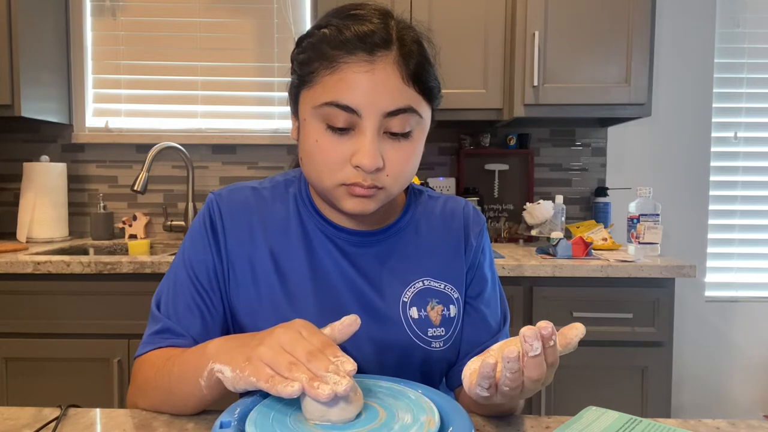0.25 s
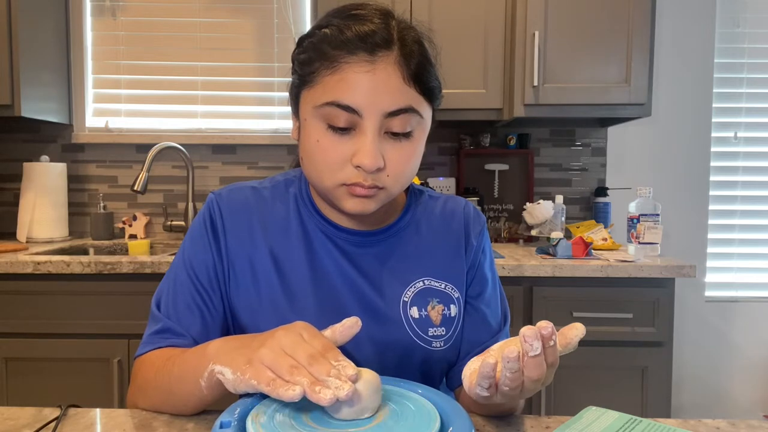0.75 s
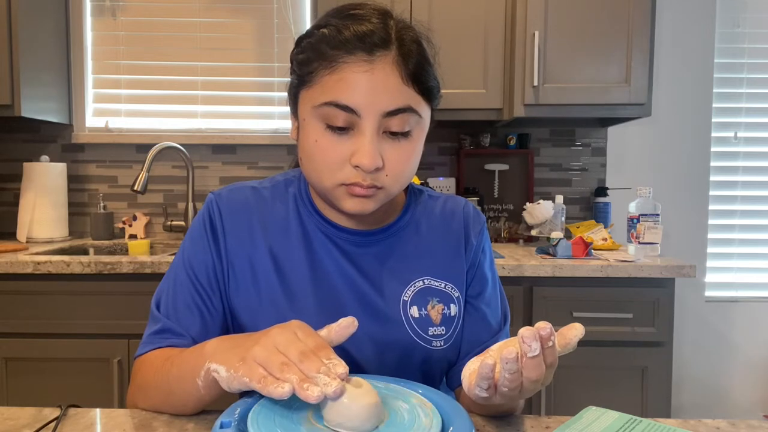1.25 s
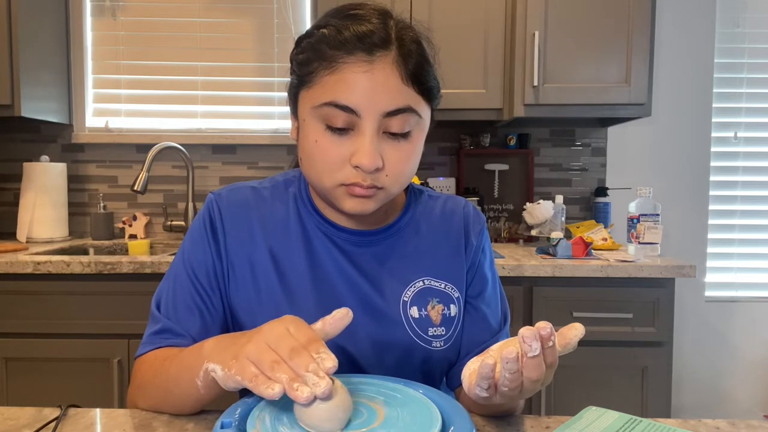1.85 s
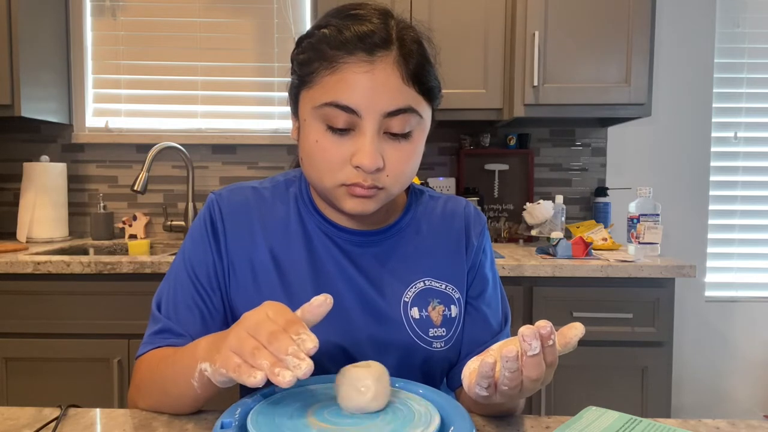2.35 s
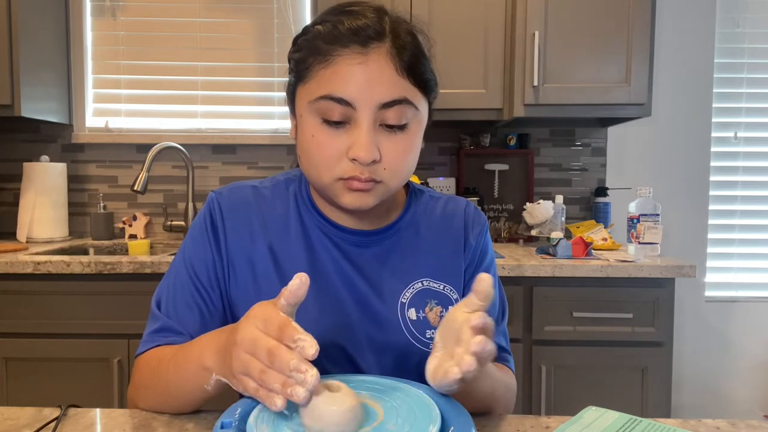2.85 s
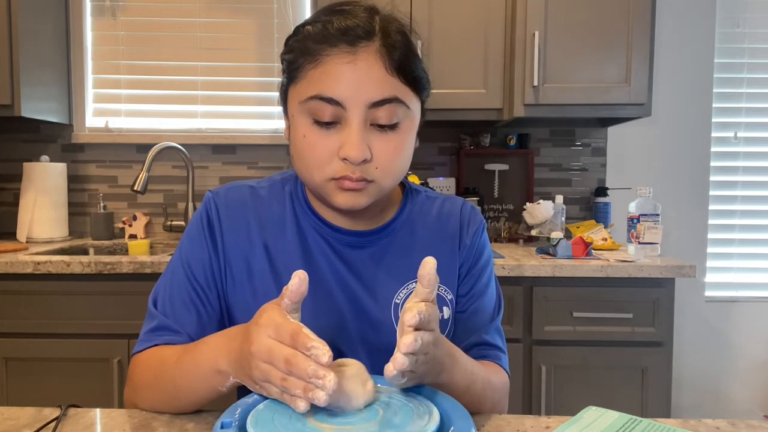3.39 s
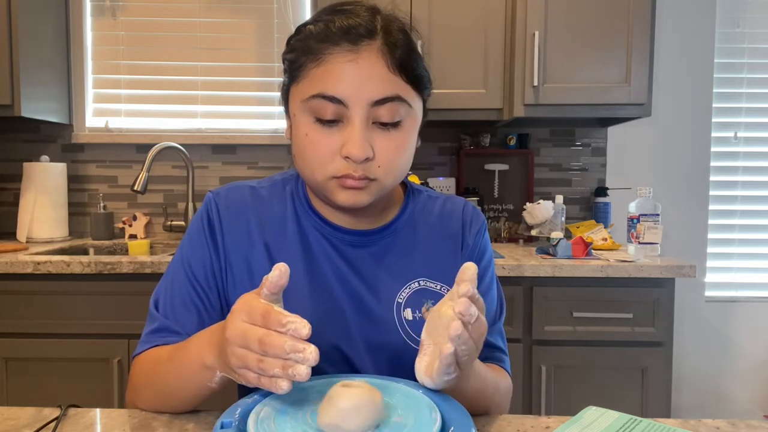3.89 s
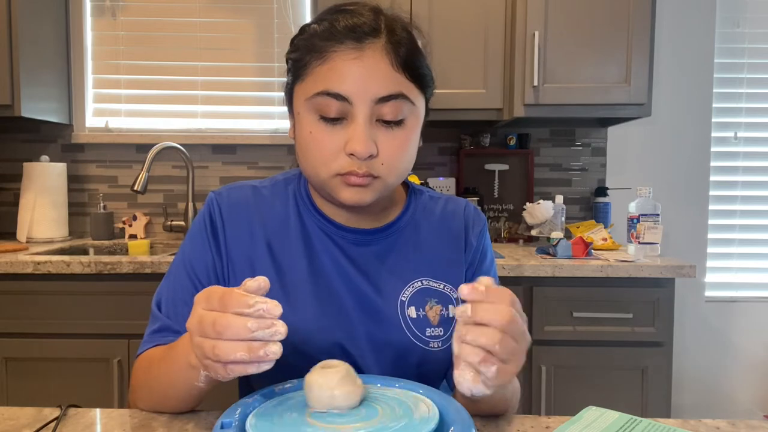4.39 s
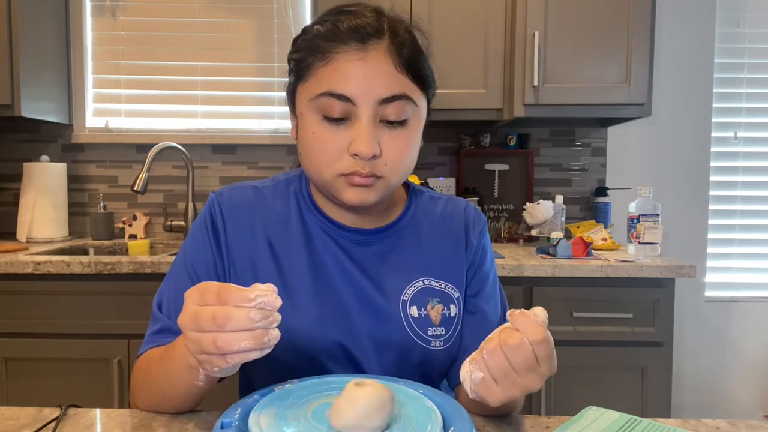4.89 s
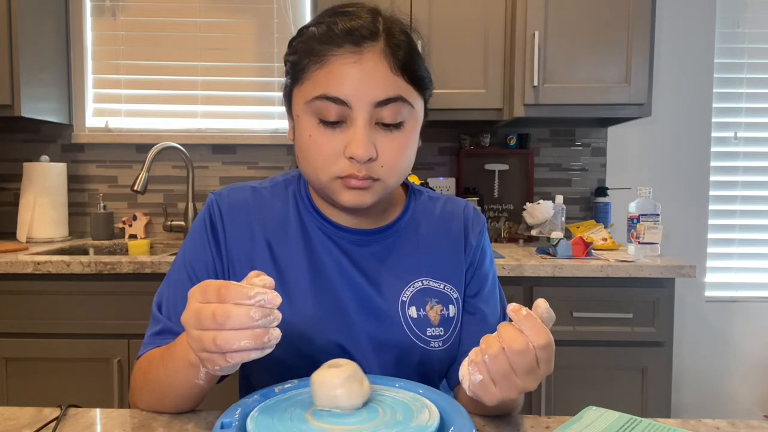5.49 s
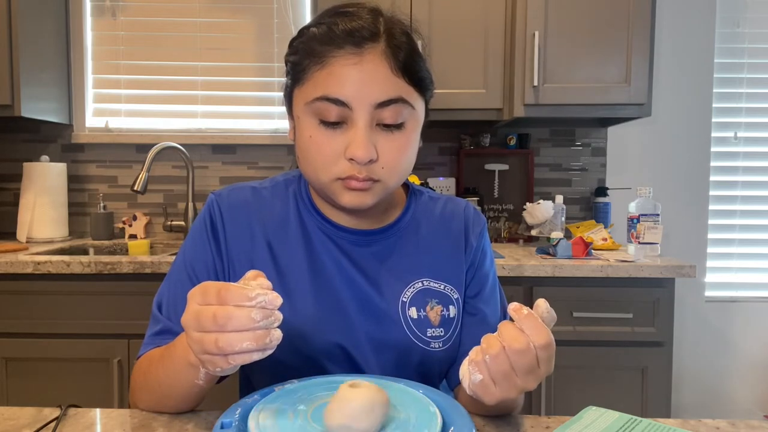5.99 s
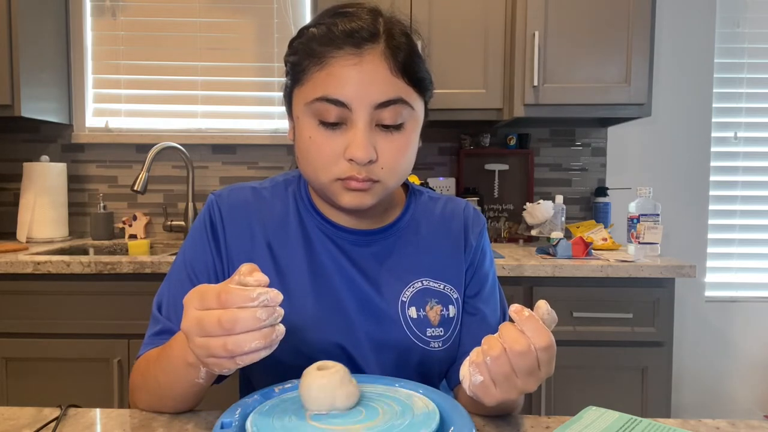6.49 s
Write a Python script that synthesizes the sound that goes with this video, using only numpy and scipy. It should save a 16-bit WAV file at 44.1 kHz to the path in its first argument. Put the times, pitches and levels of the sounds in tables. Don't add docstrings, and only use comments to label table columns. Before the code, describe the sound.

A battery toy pottery wheel is already running at the start and never stops, close to a stereo phone in a reflective kitchen. Plastic gears give a nasal, buzzing whine near 500 Hz with two strong overtones, wrapped in a dry, hollow rattle and bright ticking that flutters about twenty times a second. The pitch starts slightly low, climbs by 0.6 s, then sags from 1.1 s as a hand loads the clay, lowest near 1.5 s, where the whine is firmer and clearer. It wobbles, then jumps up around 2 s, looser and more rattly. Another brief dip comes at 2.9-3.1 s, recovering by 3.35 s. From there to 6.7 s the speed is nearly steady, the tone trembling with momentary dropouts. Small sharp plastic clicks occur irregularly throughout, roughly a tenth of a second apart early on. Faint fridge hum and low air rumble lie beneath, with a short room tail.

```python
import sys
import numpy as np
from scipy import signal
from scipy.fft import rfft, irfft, next_fast_len
from scipy.io import wavfile
from scipy.ndimage import uniform_filter1d

SR = 44100
rng = np.random.default_rng(int(sys.argv[2]) if len(sys.argv) > 2 else 0)


def wrap_up_sound(samples):
    columns = np.atleast_2d(samples).T
    tamed = np.clip(columns, -1, 1)
    steps = np.round(tamed * 32767).astype(np.int16)
    wavfile.write(sys.argv[1], SR, steps)


def gain_from_db(level_db):
    decades = np.asarray(level_db, float) / 20
    return 10 ** decades


N = 297234
SIZE = next_fast_len(N + SR)
HZ = np.arange(SIZE // 2 + 1) * SR / SIZE
TIME_S = np.arange(N) / SR


def level(x, db=0):
    return x * gain_from_db(db) / np.sqrt(np.mean(x ** 2))


def curve(table):
    time_s, value = np.transpose(table)
    return np.interp(TIME_S, time_s, value)


def over_hz(table):
    hz, value = np.transpose(table)
    return np.interp(np.log(HZ + 1), np.log(hz + 1), value)


def causal(db):
    cepstrum = irfft(db * np.log(10) / 20, SIZE)
    cepstrum[1:SIZE // 2] *= 2
    cepstrum[SIZE // 2 + 1:] = 0
    return np.exp(rfft(cepstrum))


def through(x, response):
    return irfft(rfft(x, SIZE) * response, SIZE)[..., :N]


def walk(rate):
    held = np.repeat(rng.standard_normal(int(N / SR * rate) + 2), 8)
    slewed = uniform_filter1d(uniform_filter1d(held, size=8), size=8)
    return np.interp(np.arange(N) * 8 * rate / SR, np.arange(len(held)), level(slewed))


def resonances(hz, table):
    return sum(gain_db / (1 + (2 * (hz - peak_hz) / width_hz) ** 2) for peak_hz, width_hz, gain_db in table)


def mesh_rate():
    # time_s, mesh_rate_hz
    speed = [(0.0, 487), (0.05, 494), (0.14, 490), (0.24, 480), (0.43, 517.1), (0.593, 542.6),
             (0.958, 534.3), (1.158, 483.6), (1.383, 469.7), (1.475, 446.0), (1.68, 485.3), (1.832, 472.7),
             (2.0, 537.4), (2.256, 545.0), (2.885, 538.6), (2.971, 489.4), (3.091, 495.0), (3.349, 543.5),
             (4.3, 544.3), (6.74, 541.7)]
    inertia_s = .04
    return uniform_filter1d(curve(speed), int(inertia_s * SR))


def tight(teeth, runout):
    turns = teeth / 51.93
    swing_db = 0
    for k, (db, place) in enumerate(runout):
        swing_db = swing_db + db * np.cos(2 * np.pi * (k + 1) * (turns - place))
    return gain_from_db(swing_db)


def bites(teeth, slop, scatter_db, burst_s):
    at = np.flatnonzero(np.diff(np.floor(teeth)))
    lateness, strength = rng.standard_normal((len(at), 2)).T
    touch = np.clip(at + slop * SR / 540 * lateness, 0, N - 1).astype(int)
    gate = np.zeros(N)
    np.add.at(gate, touch, gain_from_db(scatter_db * strength))
    return signal.lfilter([1], [1, -np.exp(-1 / (burst_s * SR))], gate) * rng.standard_normal(N)


def whine(teeth, mesh_hz, free):
    # mesh_multiple, loaded_db, free_db, wander_db
    multiples = [
        (1, -37, -42, 1.73),
        (2, -34.5, -49.5, 0.5),
        (3, -35, -41, 0.5),
    ]
    rough_rad = (.12, .2, .34)
    # freq_hz, width_hz, gain_db
    singing = [
        (514.5, 44, 3),
        (956, 44, 2),
        (1540, 68, 3),
    ]
    # time_s, gain_db
    seat = [(0, 1), (.3, 0), (.5, 0), (.65, 0.5), (.8, 2.5), (1, 2), (1.2, -2), (1.37, 1.5), (1.5, 1.5),
            (1.63, 0.5), (1.85, -1.5), (1.94, 0.5), (2.01, -3), (2.3, 1), (2.8, 0.5), (3.15, -2.5),
            (3.4, 1.5), (6.74, 1.5)]
    # centre_s, length_s, first_db, second_db, third_db
    slips = [(0.038, 0.036, 1, -3, -6), (0.77, 0.045, 2.5, 2, 5), (0.924, 0.13, -5, 5, 0),
             (1.046, 0.1, -4.5, -4, 4), (.24, .1, -1, 2.5, 0), (.36, .05, -1.5, -5, -2),
             (1.17, 0.092, 0.5, 4.5, -3), (1.365, 0.091, -1.5, 2.5, 2), (1.447, 0.076, -1.5, -0.5, -6),
             (1.597, 0.065, -1, 2, 1), (1.7, 0.088, -2, 1.5, -1), (1.81, .08, 3, 3, 0),
             (2.985, .08, 1, 0.5, 1), (3.088, 0.09, 0, 0.5, 0), (1.538, 0.034, -9, -5, -12),
             (1.946, 0.032, 0, -9, 7), (1.996, 0.056, -13, -10, -6), (2.068, 0.072, 9.5, 14, 3),
             (2.16, 0.054, -16, -5, -3), (2.315, 0.1, 1, 1, 2), (2.77, 0.078, -12, -5, -6),
             (2.863, 0.039, -4, 2, -8), (3.217, 0.041, 1, -6, 4), (3.312, 0.08, -6, -6, -8),
             (3.464, 0.058, -6, 3, -8), (3.726, 0.1, -1, -5, -10), (3.985, 0.051, -22, 0, 0),
             (4.115, 0.077, 1.5, -5, 2), (4.36, 0.06, -4, -4, -8), (4.846, 0.049, -18, 0, -6),
             (5.12, 0.065, -20, -5, -3), (5.698, 0.038, -18, -6, -2), (5.975, 0.059, -4, 10, 5),
             (6.596, .05, 2, 4, -3)]

    bumps = [(np.exp(-(2 * (TIME_S - s) / length_s) ** 2), gains) for s, length_s, *gains in slips]
    wobble = .3 * walk(24)
    out = 0
    for k, loaded_db, free_db, wander_db in multiples:
        k = round(k)
        rough = rough_rad[k - 1]
        slip_db = sum(bump * gains[k - 1] for bump, gains in bumps)
        db = loaded_db + (free_db - loaded_db) * free + resonances(k * mesh_hz, singing)
        db = db + curve(seat) + slip_db + wander_db * walk(12)
        waver = (rough + .17 * k * free) * walk(70) + k * wobble
        flutter_db = (5 * rough + (1.4 + .4 * k) * free) * walk(65)
        out = out + gain_from_db(db + flutter_db) * np.sqrt(2) * np.sin(2 * np.pi * k * teeth + waver)

    for multiple, db in ((.8, -44.5), (1.8, -47)):
        strength = gain_from_db(db - 5.7 * free + 2.1 * walk(26)) * np.sqrt(2)
        out = out + strength * np.sin(2 * np.pi * multiple * teeth + 0.53 * walk(30))
    skip = gain_from_db(-47 + 3 * walk(20)) * free * np.sin(2 * np.pi * 2.5 * teeth + .7 * walk(40))
    unbalance = gain_from_db(-57 - 11 * free + 3.5 * walk(8)) * np.sin(2 * np.pi * .232 * teeth)
    return out + skip + unbalance


def rattle_levels(free):
    # free_gain_db, wander_db
    layers = [
        (8, 1),
        (-.3, .1),
        (1, .1),
        (.5, .2),
    ]
    low_db, high_db, ring_db, snap_db = (gain_db * free + wander_db * walk(3.92) for gain_db, wander_db in layers)
    play_db = 1.5 * walk(85)
    return low_db, high_db + 0.5 * play_db, ring_db + play_db, snap_db + play_db


def housing(teeth, low_db, high_db):
    # freq_hz, density_db (per Hz)
    base = [(160, -54), (270, -28), (289, -10.5), (313, -6), (380, -5.5), (502, -9), (549, -8), (666, -14),
            (844, -14), (1480, -4.5), (1590, -7.5), (1780, -7), (2300, -9.5), (2490, -15), (4000, -27),
            (5200, -82), (8800, -120)]
    # freq_hz, width_hz, gain_db
    panels = [(304, 36, 0.5), (907, 232, 8), (1406, 50, 1.5), (1570, 92, 6), (1640, 22, 4.5),
              (2025, 227, 5), (2344, 123, 6), (2685, 57, 7)]
    # swing_db, place_turns
    runout = [
        (.5, .68),
        (.9, .24),
        (.2, .25),
    ]

    cut_db = -10 * np.log10(1 + (285 / (HZ + 1)) ** 24)
    body = causal(over_hz(base) + resonances(HZ, panels) + np.maximum(cut_db, -60))
    low = 1 / (1 + (HZ / 350) ** 10)
    swell = tight(teeth, runout) * gain_from_db(.3 * walk(9))
    push = np.array([bites(teeth, slop=.2, scatter_db=1.0, burst_s=0.0023) * swell for _ in range(2)])
    lowest_panel = through(push, body * low) * gain_from_db(low_db)
    upper_panels = through(push, body * (1 - low)) * gain_from_db(high_db)
    near, far = lowest_panel + upper_panels
    return level(near, -30.5), level(far, -54.0)


def ticks(teeth, ring_db, snap_db):
    # freq_hz, density_db (per Hz)
    tick_colour = [(3000, -30), (3700, -9), (4050, -10), (4380, -2), (4600, -7), (4870, 1), (5150, -8),
                   (5450, -12), (5900, -16), (6400, -13), (6900, -20), (8250, -16), (9400, -24),
                   (10500, -25), (12300, -38), (15500, -45)]
    # swing_db, place_turns
    ring_runout = [
        (.3, .2),
        (4.3, .25),
        (1.2, .25),
    ]
    snap_runout = [
        (3, .14),
        (3.8, .255),
        (.8, .18),
    ]

    colour = over_hz(tick_colour)
    high = -10 * np.log10(1 + (6700 / (HZ + 1)) ** 10)
    low = -10 * np.log10(1 + (HZ / 6700) ** 10)
    ring = bites(teeth, slop=.1, scatter_db=2.5, burst_s=.0005) * tight(teeth, ring_runout)
    snap = bites(teeth, slop=.25, scatter_db=3.5, burst_s=.0013) * tight(teeth, snap_runout)
    ring = level(through(ring * gain_from_db(ring_db), causal(colour + low)), -42.5)
    snap = level(through(snap * gain_from_db(snap_db), causal(colour + high)), -54.5)
    return ring + snap


def kitchen():
    # freq_hz, density_db (per Hz)
    rumble = [(15, -59), (25, -39), (123, -4), (194, -9), (254, -7.5), (300, -12), (390, -15), (660, -120)]
    # freq_hz, level_db
    fridge = [(59, -68), (118.4, -60), (145.3, -65.5), (236.9, -61)]

    common, apart = through(rng.standard_normal((2, N)), gain_from_db(over_hz(rumble)))
    hum = 0
    for hz, db in fridge:
        strength = gain_from_db(db + 3.0 * walk(9)) * np.sqrt(2)
        hum = hum + strength * np.sin(2 * np.pi * hz * TIME_S + 1.7 * walk(16))
    return level(common, -55) + hum, level(apart, -67)


def knocks():
    # touch_s, peak_db
    touches = [(0.0218, -45), (0.1254, -45), (0.2364, -43), (0.826, -44), (0.9293, -54), (1.0226, -41),
               (1.1248, -40.5), (1.4007, -46), (3.335, -51), (1.5678, -46), (1.6746, -42.5), (1.7848, -43),
               (1.8895, -44), (2.0482, -51), (2.0622, -38), (2.15, -50), (2.1994, -45), (2.2777, -40),
               (2.334, -45), (2.4259, -48), (2.579, -47), (2.6605, -39), (2.7127, -49), (2.7596, -42),
               (2.9535, -38), (3.3563, -41), (3.4496, -51), (3.55, -38), (3.6042, -49), (3.6202, -42),
               (3.7394, -42), (3.925, -44), (4.023, -47), (4.0866, -46), (4.1061, -42), (4.18, -43),
               (4.1956, -40), (4.2228, -47), (3.282, -51), (4.371, -47), (4.6553, -52), (4.6713, -45),
               (4.7516, -47), (4.8653, -55), (5.3672, -47), (5.447, -47), (5.5223, -48), (5.536, -38),
               (5.6306, -45), (5.942, -38), (6.0896, -50), (6.1903, -54), (6.2277, -39), (6.2946, -40),
               (4.4174, -45), (6.4223, -50), (6.4373, -45), (6.5028, -40), (6.5745, -41), (6.6109, -48)]
    # freq_hz, density_db (per Hz)
    knock_colour = [(2500, -28), (4000, -7), (6000, -5), (8600, 0), (10500, -8), (12500, -17), (15500, -19)]
    rise_s, ring_s, gain_db = .0008, .0014, 6

    touch_s, peak_db = np.transpose(touches)
    gate = np.zeros(N)
    gate[((touch_s + rise_s) * SR).astype(int)] = gain_from_db(peak_db + gain_db)
    burst = signal.lfilter([1], [1, -np.exp(-1 / (ring_s * SR))], gate) * np.sign(rng.standard_normal(N))
    return 2 * through(burst, causal(over_hz(knock_colour)))


def ports(wheel, apart):
    # freq_hz, left_lead_rad
    port_phase = [(230, .2), (560, .85), (860, -.4), (2240, -1.5), (3100, -.8), (4390, -3.5), (5150, -2.6),
                  (5500, .3), (6500, .2), (7240, 1.2), (8350, 2.8), (10100, 3.6), (11200, 6.2),
                  (12900, 6.4), (13700, 9.3)]
    # freq_hz, left_minus_right_db
    port_shading = [(60, 5.5), (110, 1), (200, 2.5), (360, 1), (650, 0.5), (1190, 1), (2160, -0.5),
                    (3920, 4.5), (7130, 2.5), (13000, 11)]
    half = gain_from_db(over_hz(port_shading) / 2) * np.exp(.5j * over_hz(port_phase))
    return through(wheel, np.array([half, 1 / half])) + apart * np.array([[1], [-1]])


def room(source):
    # freq_hz, reflected_db
    reflected = [(60, -64), (300, -7), (1000, -1), (2500, -6), (5000, -4), (7500, -4.5), (9000, -9.5),
                 (14000, -4)]
    t = np.arange(SR // 2) / SR
    tails = rng.standard_normal((2, 4, len(t))) * gain_from_db(-60 * t / 0.23) * (t > .004)
    tails = tails / np.sqrt(np.sum(tails ** 2, axis=2, keepdims=True))
    paths = through(source, rfft(tails, SIZE) * gain_from_db(over_hz(reflected)))
    turn = np.array([2 * np.pi * rng.random() + 2.2 * walk(5) for _ in range(4)]).reshape(2, 2, N)
    shares = np.concatenate([np.cos(turn), np.sin(turn)], axis=1)
    return np.sum(paths * shares, axis=1) / np.sqrt(2)


def scene():
    mesh_hz = mesh_rate()
    teeth = np.cumsum(mesh_hz) / SR
    loaded_hz, free_hz = 524, 538
    free = np.clip((mesh_hz - loaded_hz) / (free_hz - loaded_hz), 0, 1)
    low_db, high_db, ring_db, snap_db = rattle_levels(free)
    tone = whine(teeth, mesh_hz, free)
    near, far = housing(teeth, low_db, high_db)
    tick = ticks(teeth, ring_db, snap_db)
    air, air_apart = kitchen()
    wheel = tone + near + tick + knocks() + air
    return ports(wheel, far + air_apart) + room(wheel - 0.81 * tone)


def roll_off(x):
    return signal.sosfilt(signal.butter(12, 15800, fs=SR, output="sos"), x)


def record(dry):
    return roll_off(dry)


dry = scene()
out = record(dry)
wrap_up_sound(out)
```